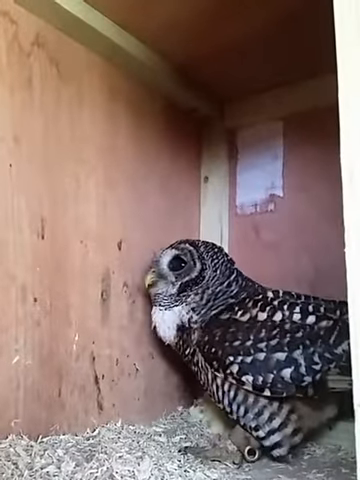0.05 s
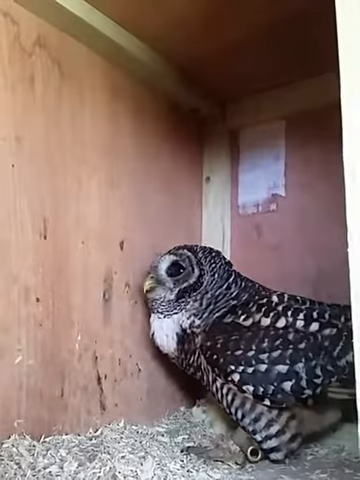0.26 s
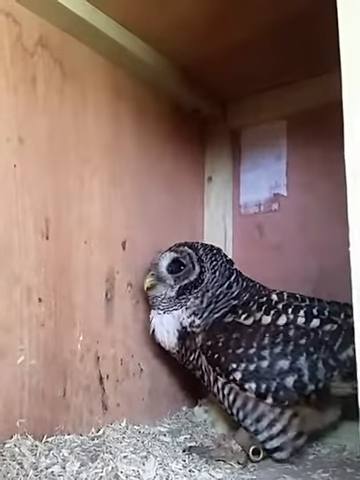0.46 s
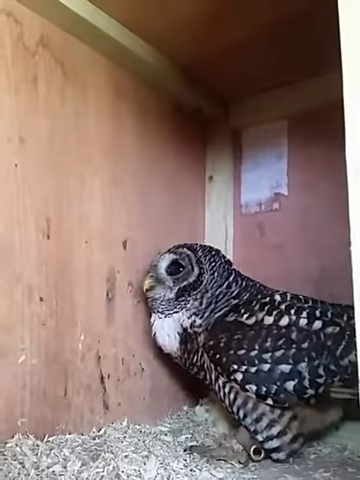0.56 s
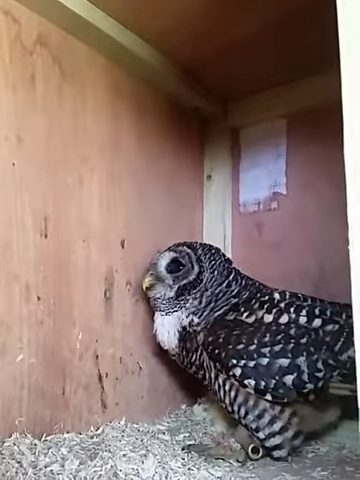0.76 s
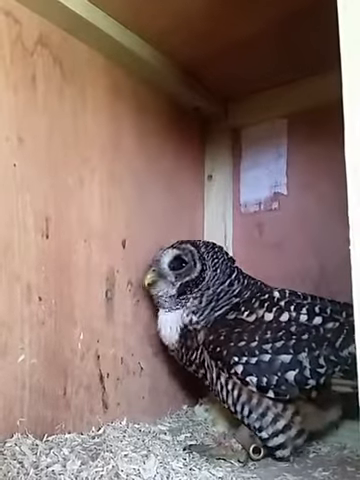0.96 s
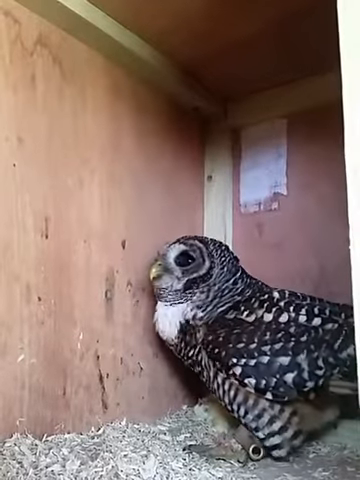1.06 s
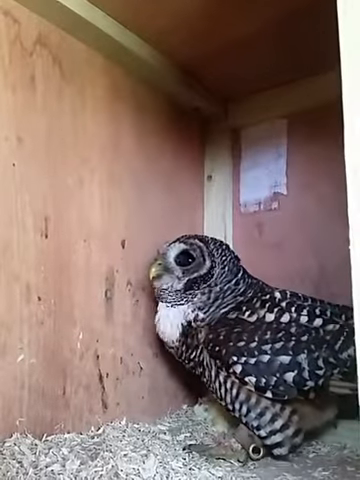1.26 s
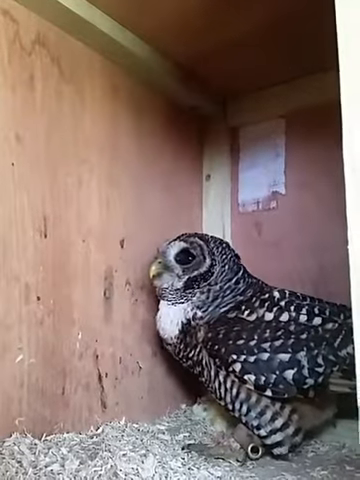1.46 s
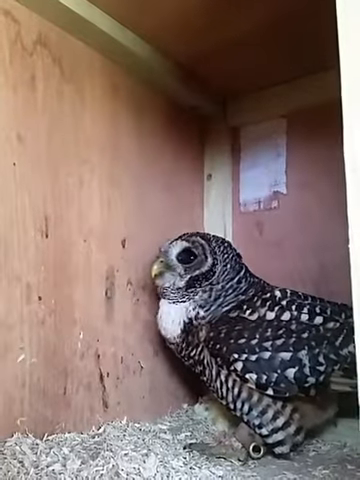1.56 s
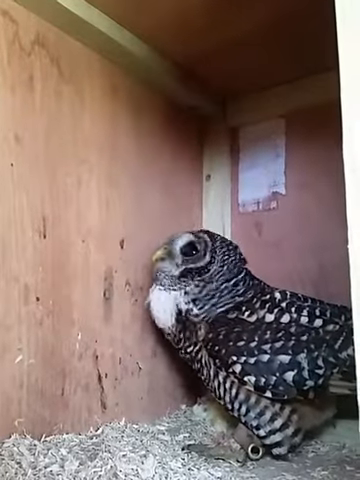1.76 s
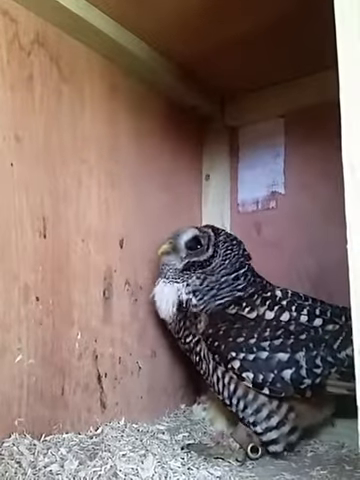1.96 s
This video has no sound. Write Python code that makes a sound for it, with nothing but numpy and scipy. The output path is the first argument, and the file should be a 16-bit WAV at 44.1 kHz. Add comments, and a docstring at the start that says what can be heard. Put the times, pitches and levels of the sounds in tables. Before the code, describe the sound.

An owl inside a wooden nest box purrs in short, low runs of quick throbs, the second loudest and the later ones softer. The calls are close and slightly hollow, over faint distant chirps and a low rumble.

```python
"""At a wooden nest box. An owl inside gives low, purring calls: quick runs of throbs, each sagging
in pitch as it swells. The box colours the voice and rings briefly. Outside, a far bird repeats
a thin three-note chirp over a low rumble, a wavering hum and a steady band of hiss."""
import sys
import numpy as np
from scipy import signal
from scipy.fft import rfft, irfft
from scipy.io import wavfile

SR = 44100
rng = np.random.default_rng(int(sys.argv[2]) if len(sys.argv) > 2 else 0)


def unload_audio(sound):
    """Save the sound as a 16-bit wav file, at the path given as the first command line argument."""
    columns = np.transpose(np.atleast_2d(sound))
    # keep every value between -1 and 1, then stretch to whole-number steps
    steps = np.round(np.clip(columns, -1, 1) * 32767)
    wavfile.write(sys.argv[1], SR, steps.astype(np.int16))


N = 88200
TIME_S = np.arange(N) / SR
FREQS_HZ = np.maximum(np.arange(N + 1) * SR / (2 * N), 1)
RIGHT_LAG_S = .00023

# rumble (frequency [Hz], relative density [dB])
RUMBLE_SPECTRUM = [(15, -4.5), (26, -13), (35, -5.5), (48, -1.5), (62, -2), (78, 0), (102, -3),
                   (130, -11.5), (190, -18.5), (230, -22.5), (290, -17), (380, -28.5), (540, -26.5),
                   (720, -35), (1020, -33.5), (1400, -44), (2000, -51.5), (3200, -79)]
# hiss (frequency [Hz], relative density [dB])
HISS_SPECTRUM = [(1500, -23), (2050, -18), (2450, -11), (2950, -18), (3400, -9.5), (3800, -1.5), (4200, 0),
                 (4700, -6), (5200, -23.5), (5900, -43.5), (6900, -33.5), (8200, -49), (10300, -37),
                 (11500, -20), (12800, -22), (15600, -25.5)]
# left-right likeness of the noise (frequency [Hz], coherence [0..1])
NOISE_COHERENCE = [(60, 0.71), (130, .72), (290, .5), (640, 0.66), (1410, .2), (3100, .02)]
# noise balance (frequency [Hz], left minus right [dB])
NOISE_LEFT_BIAS = [(60, 2), (200, 0.5), (400, 8.5), (1200, 5.5), (2400, 2), (4400, 16), (8000, 0),
                   (14000, 9)]
# hum envelope (time [s], relative level [dB])
HUM_ENVELOPE = [(0.0, -37), (0.24, -47.5), (0.28, -65.5), (0.41, -39), (1.26, -51.5), (1.39, -33),
                (1.74, -31.5), (2.0, -44.5)]
# far bird's chirps (start [s], pitch [Hz], relative level [dB])
CHIRPS = [(0.097, 2347, -0.5), (0.415, 2372, -0.5), (0.725, 2321, -3), (1.030, 2308, 0),
          (1.361, 2330, -1.5), (1.700, 2315, -5.5)]
# notes of a chirp (delay [s], length [s], pitch [ratio], relative level [dB])
CHIRP_NOTES = [(0.0, 0.038, 1.0, -61.5), (0.056, 0.042, 1.12, -66), (0.08, 0.049, 1.0, -58)]
# weighting of the chirp harmonics (frequency [Hz], gain [dB])
CHIRP_RESPONSE = [(2400, -11), (4700, 1.5), (5300, -8), (7000, -23), (8000, -28.5), (9400, -19.5),
                  (10500, -7), (11600, -2), (13000, -24.5), (14400, -19), (15500, -11)]
# owl's throbs (start [s], length [s], mid pitch [Hz], source level [dB], glide over the throb [oct])
OWL_THROBS = [(0.1793, 0.02, 194, -21.5, 0.69), (0.2024, 0.028, 195.2, -15.0, 0.24),
              (0.234, 0.03, 190.5, -16, 0.61), (0.2697, 0.026, 202, -13.5, 0.45),
              (0.3034, 0.026, 187, -15.5, 0.5), (0.3354, 0.03, 158.8, -17.5, 0.075),
              (0.5289, 0.0193, 165, -17.5, -0.55), (0.5474, 0.0245, 233.5, -12, 0.46),
              (0.5729, 0.0255, 244.2, -12.0, 0.46), (0.6047, 0.019, 278.3, -10, 0.47),
              (0.6353, 0.02, 257.6, -10.5, 0.44), (0.6643, 0.023, 180.6, -14, -0.21),
              (1.121, 0.02, 179.5, -22.5, 0.3), (1.142, 0.034, 183.8, -17.5, 0.52),
              (1.1749, 0.0309, 185.3, -17, 0.51), (1.2082, 0.03, 170.3, -17, -0.047),
              (1.2444, 0.028, 130.5, -22.5, -0.18), (1.6632, 0.021, 174.7, -27, 0.2),
              (1.6789, 0.028, 148, -18.5, 0.6), (1.7094, 0.033, 121.8, -20.5, -0.55),
              (1.9724, 0.017, 164.7, -21, -0.42), (1.985, 0.031, 166.3, -21.5, 0.3)]
# throat and box response (frequency [Hz], gain [dB])
THROAT_BOX_RESPONSE = [(90, -18.5), (151, -5.5), (198, -2.6), (253, 4), (339, 5.5), (381, 1), (438, -11.5),
                       (562, -3.5), (573, 1), (700, -25), (826, -17), (1042, -28), (1374, -43.5),
                       (2400, -57.5)]
# air modes of the box (frequency [Hz], gain [dB], T60 [s])
BOX_AIR_MODES = [(214.6, -8.5, 0.24), (340.4, 3, 0.13), (531, 4.5, 0.14), (778, -26.4, 0.2)]


def from_db(db):
    return 10 ** (np.asarray(db) / 20)


def unit_rms(x):
    return x / np.sqrt(np.mean(x ** 2) + 1e-20)


def at_hz(table, hz):
    """Table lookup on a log-frequency axis."""
    table_hz, values = np.transpose(table)
    return np.interp(np.log(hz), np.log(table_hz), values)


def drift(corner_hz):
    """Low-passed noise, rms 1."""
    white = rfft(rng.standard_normal(2 * N))
    return unit_rms(irfft(white / (1 + (FREQS_HZ / corner_hz) ** 2))[:N])


def colour(x, response):
    """Minimum-phase filter."""
    cepstrum = irfft(np.log(from_db(at_hz(response, FREQS_HZ))))
    causal_fold = np.r_[1, np.full(N - 1, 2), 1, np.zeros(N - 1)]
    return irfft(rfft(x, 2 * N) * np.exp(rfft(cepstrum * causal_fold)))[:N]


def resonate(x, hz, t60_s):
    """Two-pole resonance, peak gain 1."""
    radius = np.exp(-np.log(1000) / (t60_s * SR))
    feedback = [1, -2 * radius * np.cos(2 * np.pi * hz / SR), radius ** 2]
    return signal.lfilter(np.array([1, 0, -1]) * (1 - radius ** 2) / 2, feedback, x + 1e-18)


def reverb(x, t60_s):
    """Diffuse decaying reflections, independent per channel."""
    tail = rng.standard_normal((2, N)) * np.exp(-np.log(1000) * TIME_S / t60_s)
    return signal.fftconvolve(x[None], tail / np.sqrt(np.sum(tail ** 2) / 2), axes=1)[:, :N]


def background_noise(spectrum):
    """Steady stereo noise, rms 1: coherent in the bass, stronger and earlier on the left."""
    mid, side = rfft(rng.standard_normal((2, 2 * N)))
    sign = np.array([[1], [-1]])
    coherence = at_hz(NOISE_COHERENCE, FREQS_HZ)
    pair = np.sqrt(1 + coherence) * mid + sign * np.sqrt(1 - coherence) * side
    gain = from_db(at_hz(spectrum, FREQS_HZ) + sign * at_hz(NOISE_LEFT_BIAS, FREQS_HZ) / 2)
    lag = np.exp(1j * np.pi * sign * FREQS_HZ * RIGHT_LAG_S)
    return unit_rms(irfft(gain * lag * pair)[:, :N])


def hum(hz=60.22, wander=.03, gain_db=-2.5):
    """Low sine, wavering in pitch and level."""
    envelope_db = np.interp(TIME_S, *np.transpose(HUM_ENVELOPE))
    pitch_hz = hz * (1 + wander * drift(9.2))
    return from_db(gain_db + envelope_db) * np.sin(2 * np.pi * np.cumsum(pitch_hz) / SR)


def far_bird(fall_oct=.028, echo_db=-2, right_db=-6):
    """Thin, slightly falling notes with overtones, blurred by distance."""
    song, harmonics = np.zeros(N), np.arange(1, 7)[:, None]
    waver = 1 + .006 * drift(150)
    for start_s, hz, chirp_db in CHIRPS:
        for delay_s, length_s, ratio, note_db in CHIRP_NOTES:
            onset_s, note_hz = start_s + delay_s, hz * ratio
            on = (TIME_S >= onset_s) & (TIME_S < onset_s + length_s)
            progress = (TIME_S[on] - onset_s) / length_s
            pitch_hz = note_hz * waver[on] * 2 ** (fall_oct * (.5 - progress))
            phase = 2 * np.pi * np.cumsum(pitch_hz) / SR
            partials = from_db(at_hz(CHIRP_RESPONSE, harmonics * note_hz)) * np.sin(harmonics * phase)
            song[on] += from_db(chirp_db + note_db) * np.sin(np.pi * progress) * partials.sum(axis=0)
    return (song + from_db(echo_db) * reverb(song, t60_s=.35)) * from_db([[0], [right_db]])


def owl_syrinx(attack_s=.0048, release_s=.01, sag_oct=.67, rasp_db=-28):
    """Each throb opens, sags in pitch, brightens at its fullest, closes. Louder throbs are brighter."""
    ref_db, ref_db_per_oct, closed_db_per_oct = -10.5, -1.25, -8.5
    voice, harmonics = np.zeros(N), np.arange(1, 9)[:, None]
    jitter, shimmer = 1 + .004 * drift(90), 1 + .04 * drift(110)
    rasp = from_db(rasp_db) * drift(1500)
    for start_s, length_s, mid_hz, level_db, glide_oct in OWL_THROBS:
        on = (TIME_S >= start_s) & (TIME_S < start_s + length_s)
        age_s = TIME_S[on] - start_s
        from_mid = age_s / length_s - .5
        attack = np.sin(np.pi / 2 * np.minimum(age_s / attack_s, 1))
        release = np.sin(np.pi / 2 * np.minimum((length_s - age_s) / release_s, 1))
        opening = attack * release
        bend_oct = sag_oct * (2 * from_mid) ** 2 + glide_oct * from_mid
        phase = 2 * np.pi * np.cumsum(mid_hz * 2 ** bend_oct * jitter[on]) / SR
        db_per_oct = ref_db_per_oct + .94 * (level_db - ref_db) + closed_db_per_oct * (1 - opening)
        tone = np.sum(from_db(db_per_oct * np.log2(harmonics)) * np.sin(harmonics * phase), axis=0)
        pulsed_rasp = rasp[on] * (1 + np.cos(phase))
        voice[on] += from_db(level_db) * opening * (tone * shimmer[on] + pulsed_rasp)
    return voice


def owl_in_box(tail_db=-23, right_db=-11.5):
    """The voice rings the box's air modes; nearer the left microphone."""
    voice = colour(owl_syrinx(), THROAT_BOX_RESPONSE)
    boxed = voice + sum(from_db(db) * resonate(voice, hz, t60_s) for hz, db, t60_s in BOX_AIR_MODES)
    pair = np.array([boxed, np.interp(TIME_S - RIGHT_LAG_S, TIME_S, boxed)])
    return (pair + from_db(tail_db) * reverb(voice, t60_s=.25)) * from_db([[0], [right_db]])


def scene(rumble_db=-36.5, hiss_db=-57.5):
    """Owl and far bird over hum, rumble and hiss."""
    tonal = owl_in_box() + far_bird() + hum()
    rumble = from_db(rumble_db) * background_noise(RUMBLE_SPECTRUM)
    hiss = from_db(hiss_db) * background_noise(HISS_SPECTRUM)
    return tonal + rumble + hiss


def record(dry):
    """Steep low-pass."""
    cutoff_hz = 15750
    return signal.sosfilt(signal.ellip(12, .1, 80, cutoff_hz, fs=SR, output="sos"), dry)


dry = scene()
out = record(dry)
unload_audio(out)
```